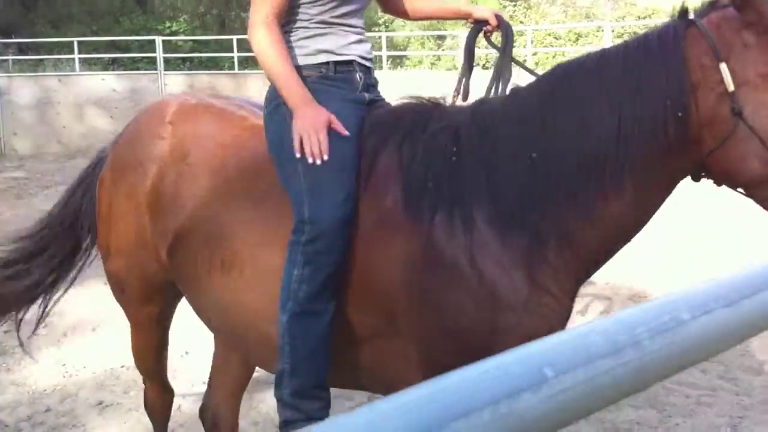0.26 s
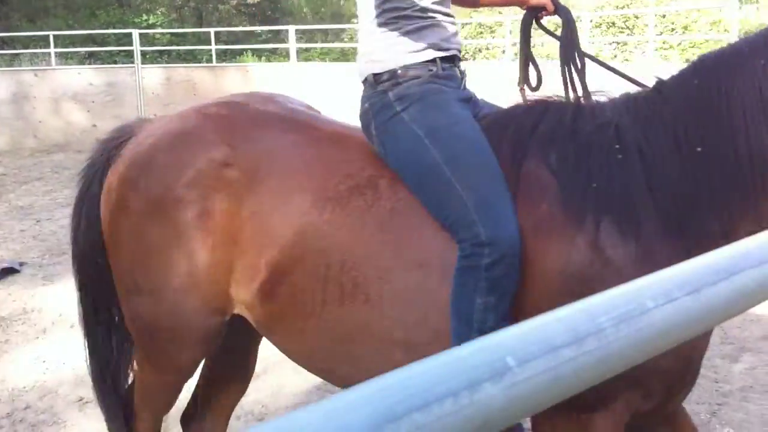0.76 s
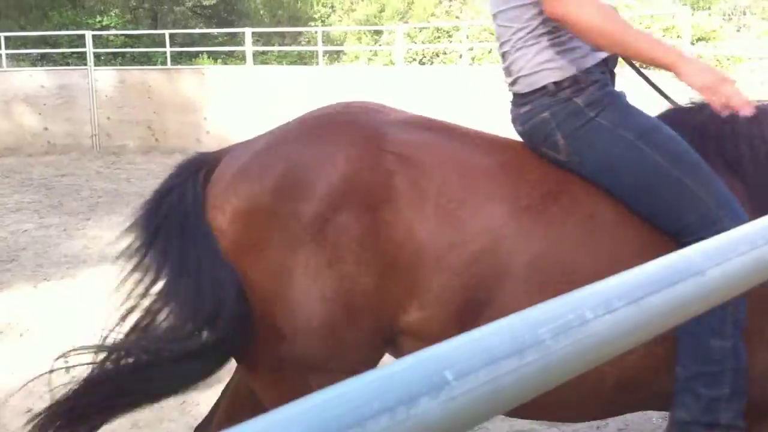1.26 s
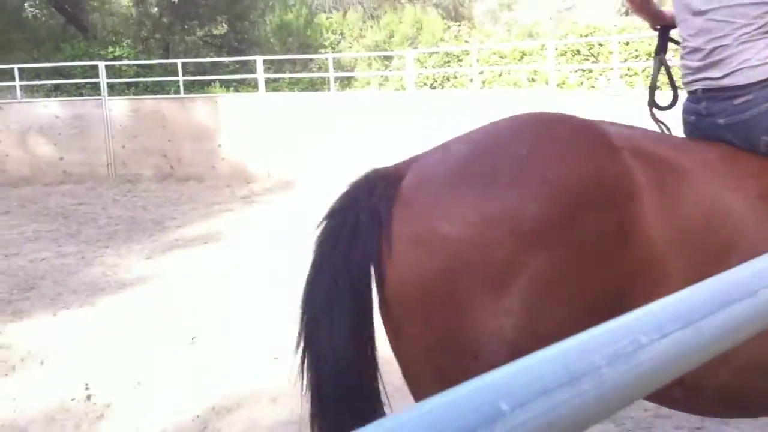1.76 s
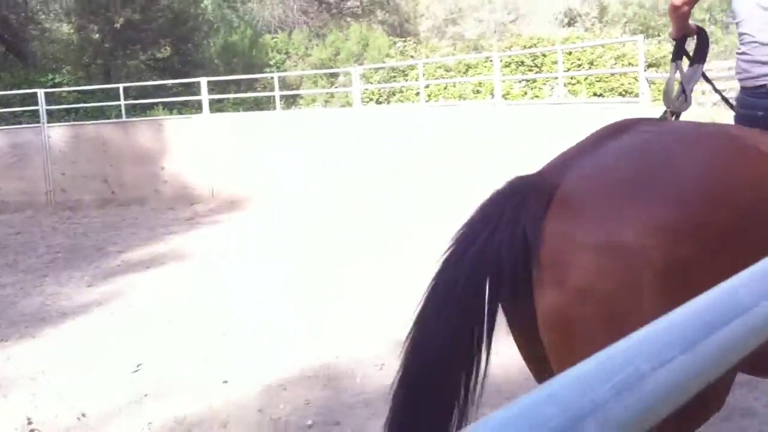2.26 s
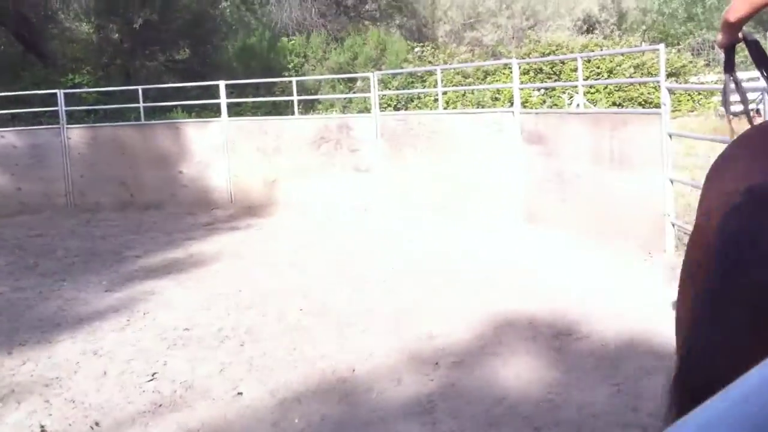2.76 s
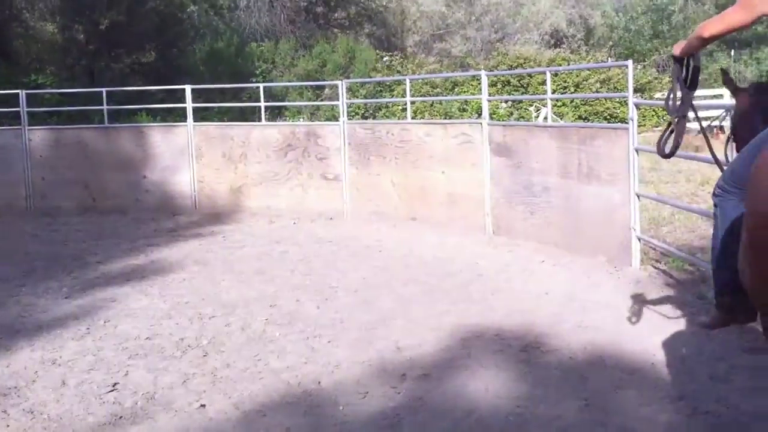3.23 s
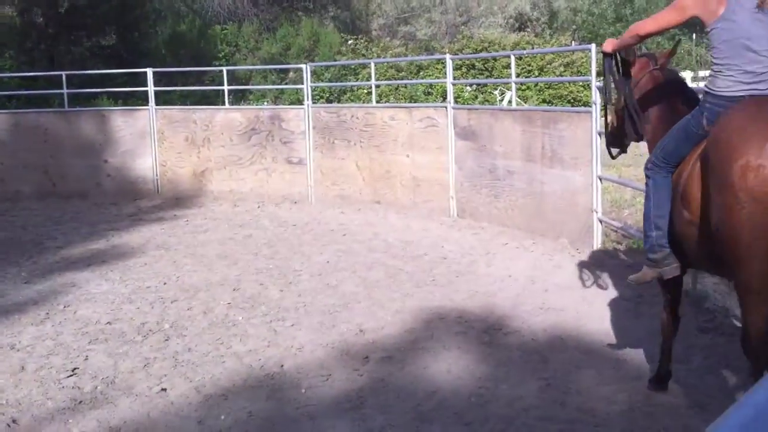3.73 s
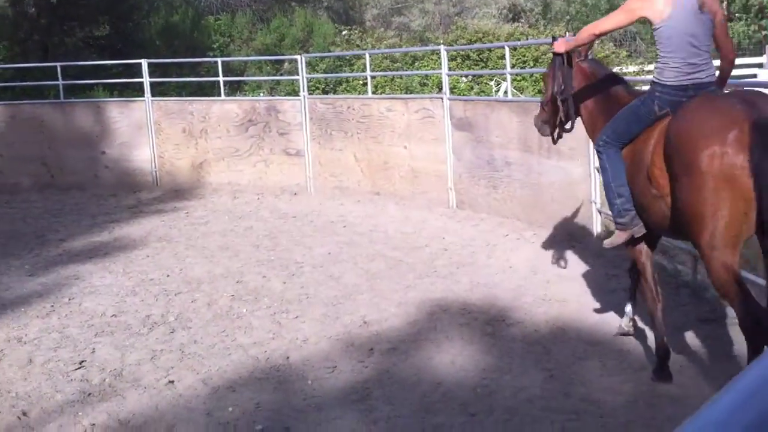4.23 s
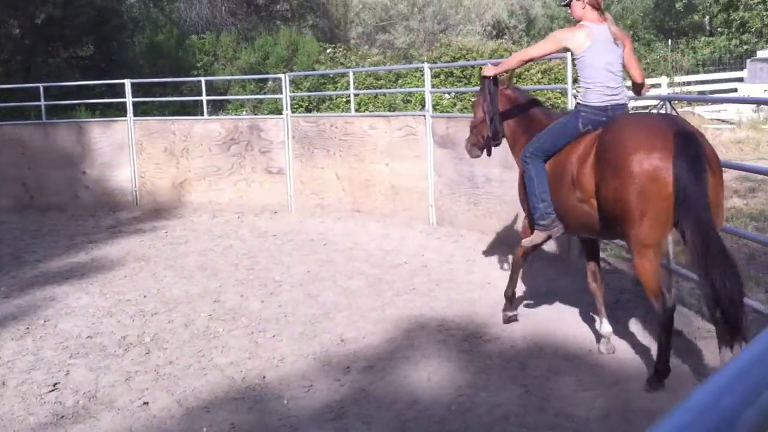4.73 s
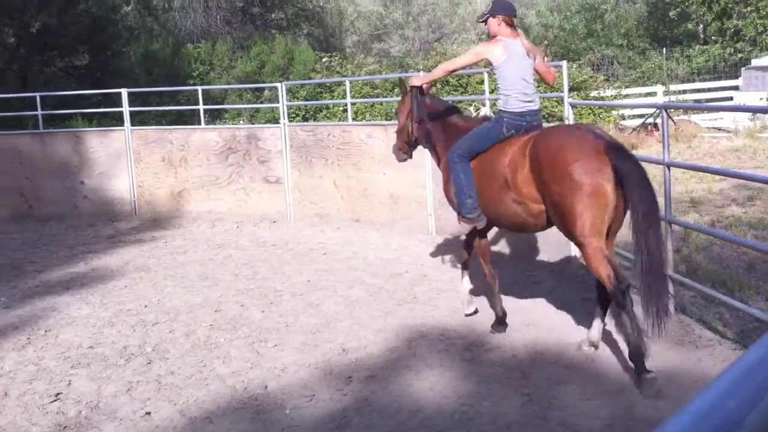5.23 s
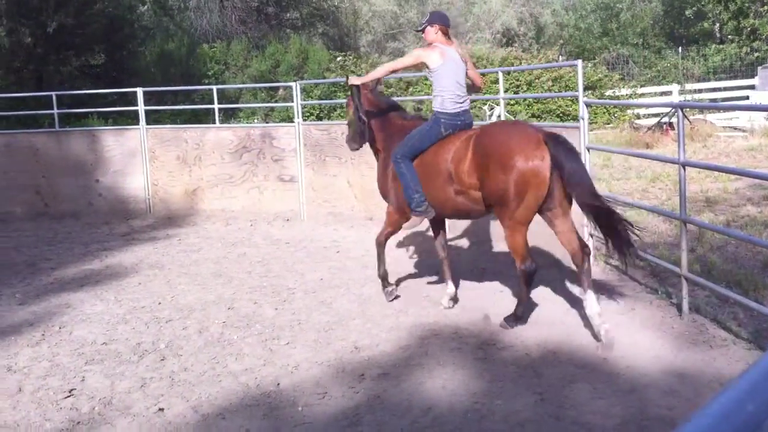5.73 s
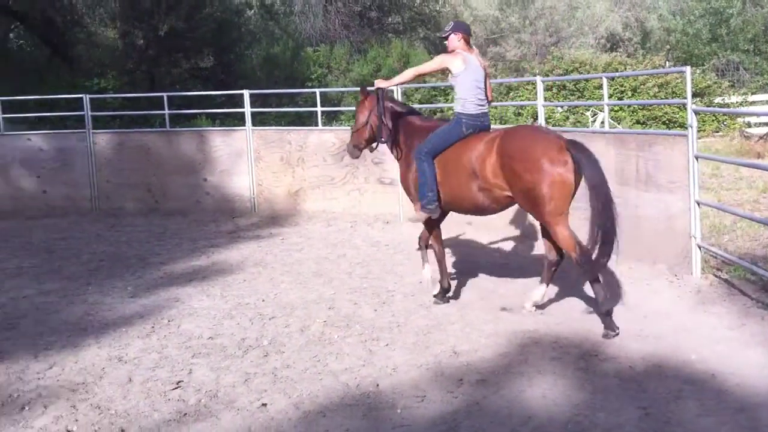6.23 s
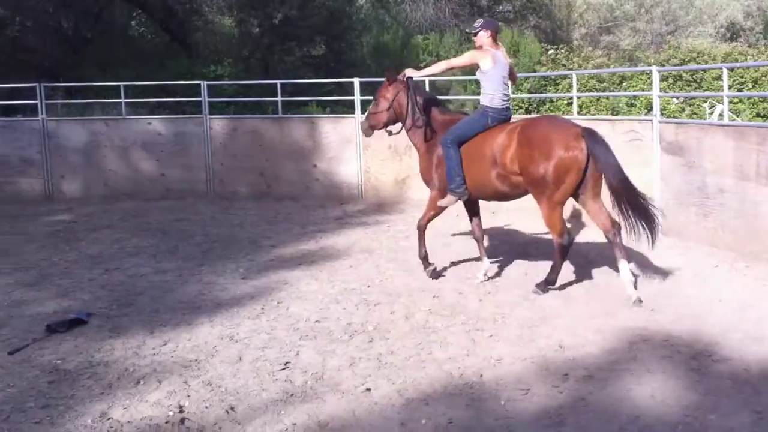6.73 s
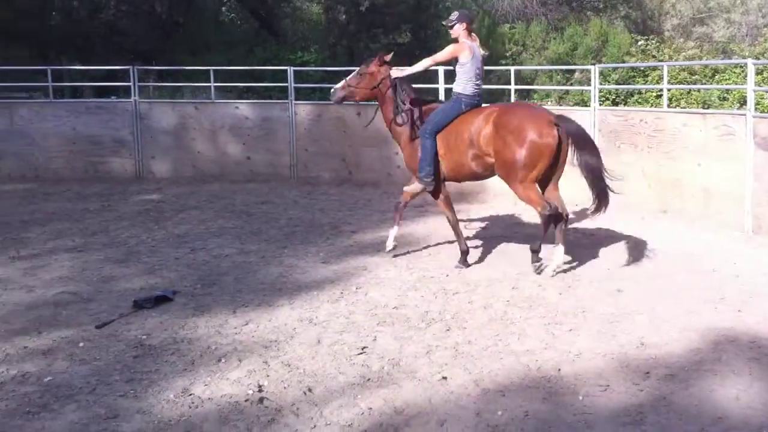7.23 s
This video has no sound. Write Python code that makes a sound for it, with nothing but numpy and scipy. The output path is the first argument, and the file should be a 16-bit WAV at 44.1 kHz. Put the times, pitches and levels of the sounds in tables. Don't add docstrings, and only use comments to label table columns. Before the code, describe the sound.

A ridden horse steps off across pen sand with sharp hollow hoof knocks, crunching grit and tack clinks, over a faint distant engine hum.

```python
import sys
import numpy as np
from scipy import signal
from scipy.io import wavfile
from scipy.ndimage import uniform_filter1d

SR = 44100
rng = np.random.default_rng(int(sys.argv[2]) if len(sys.argv) > 2 else 0)


def invert_db(level):
    return 10 ** (np.asarray(level, dtype=float) / 20)


def file_out(sig):
    cols = np.atleast_2d(sig).T
    lim = np.clip(cols, -1, 1)
    pcm = np.round(lim * 32767).astype(np.int16)
    wavfile.write(sys.argv[1], SR, pcm)


N = 330309
SNAP_THUD_DB = -12


def rms_one(x):
    return x / np.sqrt(np.mean(x ** 2) + 1e-20)


def in_time(rows):
    s, *columns = np.transpose(rows)
    return [np.interp(np.arange(N) / SR, s, c) for c in columns]


def band(x, low_hz, high_hz):
    edges_hz = [low_hz, min(high_hz, .45 * SR)]
    return signal.sosfilt(signal.butter(2, edges_hz, "band", fs=SR, output="sos"), x)


def resonance(x, hz, width):
    r = np.exp(-np.pi * width / SR)
    feedback = [1, -2 * r * np.cos(2 * np.pi * hz / SR), r * r]
    return signal.lfilter(np.array([1, 0, -1]) * (1 - r * r) / 2, feedback, x)


def hollow(hit, hz, width):
    wide = 1.35 * max(width, 150 + 0.11 * hz)
    once = resonance(hit, hz, wide)
    return resonance(once, hz, wide) + 0.64 * once


def drift(rate):
    r = np.exp(-80 * np.pi * rate / SR)
    slow = signal.lfilter([1], [1, -2 * r, r * r], rng.standard_normal(N // 40 + 2002))[2000:]
    return np.interp(np.arange(N) / 40, np.arange(len(slow)), rms_one(slow))


def ticks(rows, rise_s, t60, tail_db, tail_t60, width, broad, crack_hz, uneven_db, lead_db=-40.0, swell_db=-40.0):
    out, t = np.zeros(N + 2048), np.arange(2048) / SR
    luck = rng.standard_normal((len(rows), 2, 2048))
    for (s, hz, ring_db, crack_db, thud_db), (a, b) in zip(rows, luck):
        rise_db = -30 * np.clip(1 - t / rise_s, 0, 1)
        burst = invert_db(rise_db - 60 * np.maximum(t - rise_s, 0) / t60)
        uneven = uneven_db * b.repeat(40)[:2048]
        tail = invert_db(tail_db - 60 * t / tail_t60 + uneven) * (t > rise_s)
        hit = a * (burst + tail)
        hit[round(rise_s * SR)] += invert_db(lead_db)
        struck = hit + invert_db(swell_db) * signal.unit_impulse(2048)
        ring = resonance(resonance(struck, hz, width), hz, 1.8 * width)
        ring = ring + broad * band(hit, 680, 4030)
        parts = band(hit, 202, 504), ring, band(hit, *crack_hz)
        at = round(s * SR)
        for part, db in zip(parts, (thud_db, ring_db, crack_db)):
            loudest = np.sqrt(uniform_filter1d(part ** 2, size=176).max())
            out[at:at + 2048] += invert_db(db + 1.5) * part / loudest
    return out[:N]


def contacts(rows, width_share):
    out, click = np.zeros(N + 1024), np.r_[.5, 1, .5, np.zeros(1021)]
    for s, peak_db, hz in rows:
        width = width_share * hz + 150
        sound = resonance(resonance(click, hz, width), hz, width)
        at = round(s * SR)
        out[at:at + 1024] += invert_db(peak_db) * sound / np.abs(sound).max()
    return out[:N]


def coloured(whites, spectrum, patchy_db):
    hz, db = np.transpose(spectrum)
    out, edges = 0, 22 * 2 ** np.arange(0, 9.7, 1 / 3)
    for k, (low, high) in enumerate(zip(edges, edges[1:])):
        if hz[0] <= np.sqrt(low * high) <= hz[-1] * 1.1:
            level_db = np.interp(np.log(low * high) / 2, np.log(hz), db)
            out = out + invert_db(level_db + patchy_db * drift(9.1)) * band(whites[k % 2], low, high)
    return rms_one(out)


def background():
    # f/Hz at first, width of rumble/Hz, level/dB
    harmonics = [(72, 6.8, -20.5), (115.7, 17, -9), (156.5, 44, -0.5), (185.7, 18, -5.5), (230, 23, -9.5)]
    # f/Hz, level per Hz/dB
    road_colour = [(22, -19), (50, -10), (85, -6), (140, -2.5), (300, -1.5), (560, -5.5), (950, 1.5),
                   (1300, -2.5), (2400, -8), (4200, -19), (6000, -17)]
    # t/s, level/dB
    nearing = [
        (0.0, -70),
        (0.4, -78),
        (1.5, -72),
        (2.3, -63.5),
        (3.1, -68),
        (4.5, -63.5),
        (5.7, -62.5),
        (6.6, -59),
        (7.49, -57.5),
    ]
    # t/s, level/dB
    traffic = [
        (0, -65),
        (1.3, -66.5),
        (1.9, -63.5),
        (2.5, -64),
        (3.2, -61.5),
        (3.9, -64.5),
        (7.49, -63.5),
    ]
    sag_per_s = .0112
    (engine_db,), (road_db,) = in_time(nearing), in_time(traffic)
    white, t, hum = rng.standard_normal((4, N)), np.arange(N) / SR, 0
    turns = np.cumsum(1 - sag_per_s * t + 0.0039 * drift(2.38)) / SR
    for hz, width, db in harmonics:
        tone = np.sqrt(2) * invert_db(1.4 * drift(2.06)) * np.sin(2 * np.pi * hz * turns)
        centre = hz * (1 - sag_per_s * t[-1] * 0.61)
        rumble = rms_one(resonance(resonance(white[2], centre, width), centre, width))
        hum = hum + invert_db(db) * (tone + invert_db(-4) * rumble)
    engine = invert_db(engine_db + 0.5 + 0.61 * drift(14)) * rms_one(hum)
    road = invert_db(road_db + 3.0) * coloured(white, road_colour, patchy_db=2.0)
    hiss = invert_db(-70 + .8 * drift(3)) * rms_one(band(white[3], 3700, 18200))
    return engine + road + hiss


def tack_clinks():
    # t/s, ring f/Hz, ring level/dB, crack level/dB
    clinks = [(0.068, 2140, -40, -81), (0.079, 2660, -48.5, -56), (.085, 2500, -53, -70),
              (0.663, 2010, -47, -89), (0.673, 1900, -60, -56), (0.95, 2070, -43, -68),
              (.955, 2190, -49, -69), (0.960, 2330, -50, -58), (0.972, 2400, -56.5, -57),
              (1.236, 2200, -53, -69), (1.246, 2100, -48, -72), (1.545, 2160, -50.5, -79),
              (1.559, 2610, -50, -72), (1.831, 2220, -51.5, -64), (2.373, 2400, -55.5, -66),
              (5.102, 2340, -51, -70), (6.638, 2330, -55, -82)]
    tack = [(*row, row[2] - 23) for row in clinks]
    return ticks(tack, 0.002, 0.049, -20, 0.098, width=190, broad=0.12,
                 crack_hz=(3400, 7000), uneven_db=7.0, swell_db=21.0)


def grains(spread_db):
    sizes = invert_db(spread_db * np.minimum(rng.exponential(1, (2, N)), 6))
    signs = rng.choice([-1, 1], (2, N))
    return sizes * signs * invert_db(2.43 * drift(86))


def sand():
    # t/s, length/s, crunch level/dB, spray level/dB
    kicks = [(0.126, 0.055, -59, -62), (0.187, .13, -60.5, -60), (0.405, 0.11, -55.5, -62),
             (0.548, 0.08, -61, -71.5), (0.777, 0.02, -66, -61), (1, 0.061, -57, -62.5),
             (1.169, 0.14, -56, -65.5), (1.292, 0.049, -52.5, -57.5), (1.362, 0.17, -64.5, -72.5),
             (1.551, 0.044, -54, -66.5), (1.708, 0.045, -60, -60.5), (2.032, 0.047, -53.5, -60),
             (2.196, 0.085, -58, -57.5), (2.302, 0.087, -75, -65.5), (2.42, 0.16, -65, -59),
             (2.438, 0.033, -72, -50), (2.763, 0.03, -53, -52), (2.849, 0.023, -53, -57),
             (3.215, 0.26, -65.5, -64), (3.423, 0.077, -59, -60.5), (4.182, 0.064, -62, -68),
             (4.26, 0.02, -56, -61), (4.281, .02, -58, -59), (5.064, .024, -60, -60),
             (4.785, 0.067, -62.5, -61), (5.241, 0.026, -68, -63.5), (5.506, 0.039, -60.5, -66.5),
             (5.655, 0.042, -64, -64), (5.724, 0.078, -63, -65), (6.042, 0.04, -71, -65.5),
             (0.947, 0.032, -64, -61.5), (6.107, 0.077, -68, -72.5), (6.27, 0.058, -62.5, -58.5),
             (6.383, 0.059, -59, -60), (7.45, 0.031, -65, -64.5)]
    # t/s, length/s, crunch level/dB, spray level/dB
    presses = [(0.756, 0.076, -59.5, -64), (2.033, 0.14, -56, -65.5), (2.903, 0.15, -55, -60),
               (3.152, 0.058, -61, -68.5), (3.644, 0.053, -58, -62.5), (3.828, 0.017, -67, -61),
               (4.016, 0.11, -65, -67.5), (4.324, 0.089, -58.5, -72), (4.406, .078, -69, -67.5),
               (4.655, 0.052, -67, -64), (4.99, 0.032, -56, -62), (5.025, 0.12, -56, -59),
               (5.831, 0.068, -61.5, -61.5), (6.43, 0.091, -61, -61.5), (6.484, 0.15, -62.5, -72),
               (6.788, 0.028, -64, -64.5), (7.042, .097, -76, -64.5), (7.178, 0.098, -60.5, -64)]
    # low f/Hz, high f/Hz
    grain_bands = [
        (900, 3750),
        (4800, 8710),
        (9000, 15100),
    ]
    kick_dust_db, press_dust_db = 4.5, -1.5
    dust_fade_db_per_s = 0.8
    stroke_power = np.zeros((3, N))
    drags = [(*row, kick_dust_db) for row in kicks] + [(*row, press_dust_db) for row in presses]
    for s, length, crunch_db, spray_db, dust_db in drags:
        levels_db = crunch_db, spray_db, spray_db + dust_db - dust_fade_db_per_s * s
        a, b = round(s * SR), min(round((s + max(length, .005)) * SR), N)
        swell = 0.15 + 0.91 * np.sin(np.linspace(0, np.pi, b - a)) ** 2
        stroke_power[:, a:b] += swell * invert_db(np.array(levels_db))[:, None] ** 2
    smooth = uniform_filter1d(stroke_power, size=300)
    stroke = np.sqrt(np.abs(signal.lfilter([.008], [1, -.992], smooth)))
    grit, out = grains(3.93), 0
    for gain, (low, high) in zip(stroke, grain_bands):
        edges = np.geomspace(low, high, num=4)
        patches = [invert_db(2.3 * drift(17.7)) * band(grit[k % 2], *edges[k:k + 2]) for k in range(3)]
        out = out + gain * rms_one(band(sum(patches), low, high))
    return out


def footfalls():
    # t/s, ring f/Hz, ring level/dB, crack level/dB, thud level/dB
    steps = [(.137, 1060, -50.5, -50.5, -54.5), (.463, 1980, -52, -68, -56), (.781, 1250, -65, -51.5, -66),
             (.815, 2620, -51.5, -55.5, -61), (.84, 2120, -58, -63, -70), (.921, 2010, -60, -55.5, -73),
             (1.723, 1950, -52.5, -54, -71), (2.431, 1220, -70, -50, -78), (2.541, 950, -45, -49, -50),
             (2.579, 1280, -80, -55.5, -65), (2.768, 1397, -41.5, -47, -55), (2.992, 2000, -47, -54, -60),
             (3.002, 1150, -43.5, -56, -57), (3.149, 1420, -54, -66, -66), (3.161, 1420, -50, -66, -61),
             (3.971, 1320, -49, -46, -59), (4.095, 1320, -49.5, -53, -54), (4.829, 1150, -51, -71, -60.5),
             (5.055, 2220, -46, -75, -54.5), (5.257, 1460, -60.5, -66, -53.5), (5.716, 1320, -56, -61, -52),
             (5.755, 2040, -54, -51.5, -48), (6.499, 2780, -49, -68, -52), (7.146, 2630, -52.5, -71, -58),
             (7.241, 1000, -50.5, -63, -50)]
    return ticks(steps, 0.0027, 0.037, -6, 0.1, width=450, broad=0.36, crack_hz=(4600, 16000), uneven_db=5.0)


def flecks():
    # t/s, peak level/dB, ring f/Hz
    flung = [(0.1764, -43, 9980), (0.1904, -38, 8720), (0.2064, -45, 10900), (0.2414, -42, 11100),
             (0.2644, -32, 8530), (0.2724, -34, 9800), (0.3054, -44, 7160), (0.3296, -44, 8780),
             (0.7824, -45, 13200), (0.7944, -47, 5600), (0.8044, -42, 9280), (0.972, -32, 11200),
             (2.0757, -44, 5990), (2.1186, -44, 5630), (2.2038, -41, 9240), (2.2774, -46, 9920),
             (2.3774, -55, 6060), (2.4774, -39, 9980), (3.2364, -52, 13000), (3.301, -48, 12150),
             (3.3444, -46, 5930), (3.4674, -49, 6200), (6.0514, -50, 7880), (6.059, -45, 7630)]
    return invert_db(-4.5) * contacts(flung, width_share=.25)


def pebble_snaps():
    # t/s, ring f/Hz, ring level/dB, crack level/dB
    snaps = [(0.256, 1960, -41.5, -45), (0.292, 2360, -54, -54), (0.733, 2650, -51, -40.5),
             (0.896, 1270, -64, -59), (1.282, 2410, -49, -63), (1.343, 1470, -58, -56.5),
             (1.449, 1280, -60, -56), (2.418, 1270, -68, -54), (3.319, 1240, -52, -57),
             (3.52, 1460, -60, -59), (3.685, 1650, -49.5, -73), (4.356, 2510, -50.5, -65),
             (4.41, 1030, -59, -53), (4.616, 1000, -77, -58), (6.24, 1350, -64, -53),
             (6.259, 1060, -69, -56), (7.054, 1680, -55, -53.5)]
    pebbles = [(*row, row[2] + SNAP_THUD_DB) for row in snaps]
    return ticks(pebbles, 0.00322, 0.0016, -25.0, 0.081, width=360, broad=0.72,
                 crack_hz=(5000, 16500), uneven_db=4.0, lead_db=16.0)


def rolling_touches():
    # t/s, peak level/dB, ring f/Hz
    touches = [(0.3636, -32, 2130), (0.3653, -34, 1500), (.3700, -22, 1200), (.3705, -36, 8300),
               (.3662, -17, 4560), (1.1767, -18.5, 3080), (1.1781, -21, 1900), (1.1805, -37, 486),
               (1.1835, -31.5, 470), (1.1775, -37, 9150), (1.1785, -27, 7750), (1.1782, -23, 2350),
               (2.0207, -19, 2400), (2.0224, -6, 2450), (2.029, -29, 2500), (2.8972, -33, 1820),
               (2.9016, -27.5, 276), (2.9035, -26, 4930), (2.9078, -28, 5700), (2.9045, -25, 2630),
               (2.9083, -33, 2620), (2.9095, -37, 1220), (3.5921, -37, 1500), (3.5993, -29, 1180),
               (3.5972, -35, 5900), (3.5972, -48, 10400), (3.5948, -40, 6200), (3.6022, -33, 1380),
               (3.606, -36, 1794), (4.2647, -41, 1505), (4.2692, -30, 1900), (4.2711, -30, 686),
               (4.2722, -29, 1900), (4.2797, -38, 1900), (4.9733, -38, 2505), (4.977, -29, 5600),
               (4.9925, -46, 2320), (5.6384, -38, 302)]
    return contacts(touches, width_share=0.32)


def lingering_rings():
    # t/s, peak level/dB, ring f/Hz
    lingers = [
        (.378, -34, 2170),
        (2.0215, -9, 2450),
        (2.0225, -21.5, 3340),
        (2.035, -35, 2250),
        (2.774, -35, 2180),
        (2.0212, -18, 1750),
        (2.8995, -25, 600),
        (.3652, -24, 1500),
        (1.188, -45, 1980),
    ]
    return contacts(lingers, width_share=.12)


def knocks():
    # t/s, peak level/dB, thud level/dB, bounce delay/s, bounce level/dB
    strides = [(0.366, -5, -2.5, 0.0057, -17), (1.1775, -3.5, -5, 0.0093, -21),
               (2.0215, -9.5, -11, 0.026, -27), (2.8993, -13.5, 3.5, 0.0037, -8),
               (3.5937, -17.5, -1, 0.0031, -7), (3.975, -35, 7, 0.004, -2), (4.27, -23, -1, 0.0078, -21),
               (4.974, -20, -16, 0.002, -10), (5.6385, -31.5, 5.5, 0.00261, 5),
               (6.4413, -28, 0, 0.0081, -27), (6.514, -29.5, -8, 0.00097, -19),
               (7.176, -29.5, -1, 0.0031, -13)]
    # f/Hz, width/Hz, level/dB
    rings_near = [
        [(1250, 1400, 2.5), (2460, 260, 7.5), (4230, 400, 2.5), (6680, 700, 0), (9020, 650, -3)],
        [(890, 260, 1), (2000, 690, 3), (3500, 400, 2), (5660, 230, -15.5), (9150, 400, -18)],
        [(980, 600, -17), (1650, 300, -3.5), (2450, 300, -3.5), (3300, 250, -26.5), (5180, 450, -10.5),
         (7630, 665, -16)],
        [(950, 290, 5), (1600, 1200, -9.5), (2400, 620, -0.5), (4900, 540, -2), (6750, 670, -4.5)],
        [(1140, 360, 5), (1650, 215, 5.5), (2700, 570, -5.5), (5530, 1760, -12.5), (10400, 2000, -47)],
        [(170.5, 150, 15.5), (1320, 400, -13), (2250, 310, -6), (12100, 3900, -18)],
    ]
    # f/Hz, width/Hz, level/dB
    rings_away = [
        [(1150, 670, -2), (1830, 270, 5), (5140, 110, -10), (6100, 190, -5), (7740, 95, -18)],
        [(810, 174, 2), (1580, 150, 6), (2650, 900, 1.5), (5970, 120, -4.5), (7500, 180, -12.5),
         (8600, 130, -29)],
        [(830, 760, 5.5), (2980, 110, -9), (5650, 280, -34)],
        [(1060, 120, 1.5), (2160, 110, 3.5), (3260, 160, 2.5), (6330, 1800, -10)],
        [(1900, 980, -1), (3000, 1300, -4), (4650, 710, 0), (7400, 3300, -17)],
        [(755, 130, 7.5), (1580, 120, 10), (2420, 220, -28), (5670, 240, -9)],
    ]
    out, t = np.zeros(N + 4096), np.arange(-256, 3840) / SR
    luck = rng.standard_normal((len(strides), 2, 4096))
    for stride, rings, (a, b) in zip(strides, rings_near + rings_away, luck):
        s, peak_db, thud_db, bounce_s, bounce_db = stride
        contact = .03 * invert_db(-.25 * peak_db) * a * np.exp(-np.abs(t) / 0.001)
        contact[256] = 1
        bounce = signal.lfilter([.3], [1, -.7], np.interp(t - bounce_s, t, contact, left=0))
        rattle_db = -36.5 - 0.54 * peak_db
        uneven_db = 2.0 * b.repeat(40)[:4096]
        rattle = a * invert_db(rattle_db - 60 * t / 0.049 + uneven_db) * (t > 0)
        hit = contact + invert_db(bounce_db) * bounce + rattle
        modes = [(290, 303, thud_db)] + list(rings)
        sound = sum((-1) ** k * invert_db(db) * hollow(hit, hz, width) for k, (hz, width, db) in enumerate(modes))
        bare_click = invert_db(-30.5 - 0.23 * peak_db) * hit
        sound = band(sound + bare_click, 130, 18870)
        at = round(s * SR) - 256
        out[at:at + 4096] += invert_db(peak_db) * sound / np.abs(sound).max()
    return out[:N]


def bird():
    # t/s, length/s, from f/Hz, to f/Hz, level/dB
    slides = [(.69, .1, 2950, 2580, -76), (1.35, .205, 3730, 2520, -70), (2.1, .04, 3080, 3060, -72),
              (2.15, .032, 3060, 3040, -66), (2.182, 0.09, 2354, 2390, -60.5),
              (2.624, 0.014, 3260, 2600, -65), (2.643, 0.02, 2490, 2700, -61),
              (2.661, 0.018, 2700, 2700, -58), (2.682, 0.029, 2600, 2525, -61),
              (2.71, 0.019, 2520, 2376, -64), (2.726, 0.012, 2375, 2700, -63),
              (2.739, 0.013, 3000, 2620, -66), (2.754, 0.012, 2620, 2910, -60),
              (2.768, 0.029, 2760, 2400, -62), (2.8, 0.04, 2390, 2240, -65),
              (3.279, 0.022, 2800, 2920, -65), (3.3, 0.017, 2940, 3200, -66),
              (3.323, 0.017, 2566, 2450, -61), (3.34, 0.03, 2430, 2370, -59.5),
              (3.381, 0.023, 3060, 2700, -64), (3.403, 0.045, 2690, 2444, -64),
              (3.988, 0.052, 3070, 2870, -62.5), (4.041, 0.029, 2870, 2400, -60),
              (4.065, 0.018, 2400, 2400, -57), (4.11, 0.075, 3350, 3300, -69),
              (5.32, 0.063, 3150, 2950, -72)]
    s, length, from_hz, to_hz, _ = np.transpose(slides)
    corners = np.maximum.accumulate(np.ravel([s, s + length], order="F"))
    hz, = in_time(np.transpose([corners, np.ravel([from_hz, to_hz], order="F")]))
    waver, blow = drift(28), np.zeros(N)
    for s, length, *_, level_db in slides:
        blow[round(s * SR):round((s + length) * SR)] = invert_db(level_db)
    tone = np.sin(2 * np.pi * np.cumsum(hz * (1 + 0.00274 * waver)) / SR)
    out = np.sqrt(2) * invert_db(0.5 + 0.91 * waver) * uniform_filter1d(blow, size=300) * tone
    for lag_s, db in ((.011, -25), (.023, -17), (.041, -20)):
        lag = round(lag_s * SR)
        out[lag:] += invert_db(db) * out[:-lag].copy()
    return out


def stray_grit():
    # t/s, ring f/Hz, ring level/dB, crack level/dB
    specks = [(1.087, 1500, -66, -59), (1.396, 3000, -65, -60), (1.505, 2300, -70, -60),
              (1.474, 2250, -57, -61), (1.926, 2000, -65, -60.5), (2.087, 2170, -53, -62),
              (2.104, 2470, -55, -66), (2.118, 2450, -50, -68), (2.141, 2320, -54, -77),
              (2.789, 1870, -52, -62), (3.365, 1650, -54.5, -66), (3.449, 2065, -55, -66),
              (3.477, 2350, -57, -66), (6.459, 2200, -56, -67), (6.468, 3100, -57, -70),
              (6.478, 3000, -51, -71), (6.522, 2900, -55, -72), (6.533, 2820, -54, -71),
              (6.621, 3500, -62, -71)]
    rows = [(*row, row[2] + SNAP_THUD_DB) for row in specks]
    return ticks(rows, 0.0012, 0.019, -22, 0.054, width=260, broad=0.2, crack_hz=(4000, 13000), uneven_db=6.0)


def scene():
    hooves = knocks() + rolling_touches() + lingering_rings() + footfalls()
    ground = sand() + flecks() + pebble_snaps() + stray_grit()
    return (hooves + ground + tack_clinks() + bird() + background())[None]


def treble_gaps(x):
    # t/s, length/s, silent above f/Hz
    gaps = [(.345, .0155, 60), (.72, .012, 4000), (.766, .012, 6500), (.944, .008, 8000),
            (6.037, .009, 3000), (2.0295, .027, 9500), (2.0325, .024, 6500), (6.253, .007, 9000),
            (1.159, .0145, 60), (2.0355, .021, 3300), (2.883, .012, 3000), (2.915, .01, 8500),
            (3.575, .013, 3200), (3.986, .006, 4000), (4.254, .008, 3500), (6.225, .015, 7000),
            (6.43, .007, 5000), (6.5, .01, 8000), (.38, .01, 8000), (2.183, .006, 5000),
            (1.335, .007, 9000), (4.983, .006, 9000)]
    out = x.copy()
    for s, length, above_hz in gaps:
        a, b = round(s * SR), round((s + length) * SR)
        lowpass = signal.butter(10, above_hz, fs=SR, output="sos")
        low = signal.sosfiltfilt(lowpass, out[:, a - 400:b + 400])
        fade = signal.windows.tukey(b - a, .25)
        out[:, a:b] += fade * (low[:, 400:-400] - out[:, a:b])
    return out


def speckle(x):
    # t/s, length/s
    stretches = [(.06, .095), (.33, .065), (.7, .15), (.88, .12), (1.07, .03), (1.19, .04), (1.33, .04),
                 (1.435, .075), (1.755, .02), (1.87, .08), (2.11, .03), (2.18, .03), (2.405, .035),
                 (2.575, .035), (2.835, .06), (3.57, .06), (3.96, .04), (4.25, .04), (4.4, .03),
                 (4.61, .04), (4.96, .035), (6.21, .06), (6.41, .11), (7.04, .03), (7.16, .03)]
    scrap_share, above_hz, quiet_db = .35, 5000, 9
    hz, t, cells = signal.stft(x, SR, nperseg=256, noverlap=192)
    luck = rng.random((len(hz) // 4 + 1, len(t) // 4 + 1))
    luck = luck.repeat(4, 0).repeat(4, 1)[:len(hz), :len(t)]
    inside = sum((t > s) & (t < s + length) for s, length in stretches) > 0
    local = uniform_filter1d(uniform_filter1d(np.abs(cells), size=5, axis=-1), size=5, axis=-2)
    quiet = local < invert_db(quiet_db) * np.median(local, axis=-1, keepdims=True)
    lost = (luck < scrap_share) & inside & (hz[:, None] > above_hz) & quiet
    return x - signal.istft(cells * lost, SR, nperseg=256, noverlap=192)[1][:, :N]


def top_cut(x):
    return signal.sosfilt(signal.butter(12, 16870, fs=SR, output="sos"), x)


def record(dry):
    out = signal.sosfilt(signal.cheby2(18, 50, 16200, fs=SR, output="sos"), dry)
    return top_cut(speckle(treble_gaps(out)))


dry = scene()
out = record(dry)
file_out(out)
```